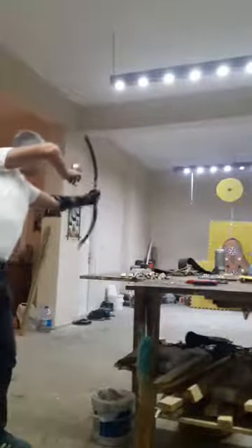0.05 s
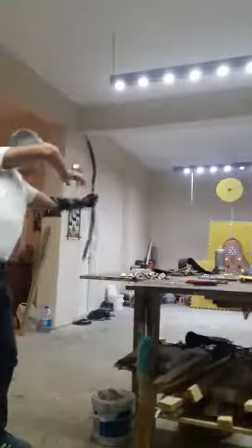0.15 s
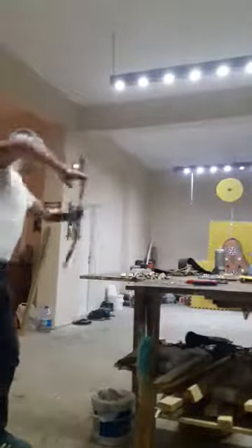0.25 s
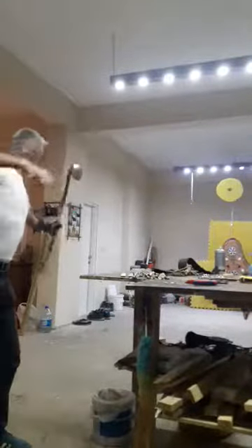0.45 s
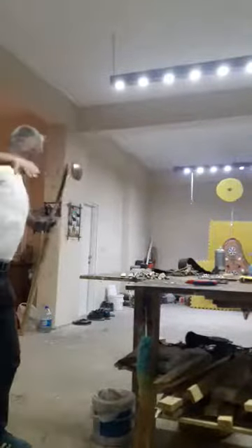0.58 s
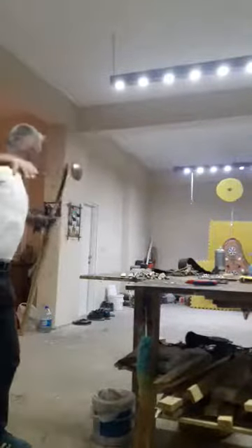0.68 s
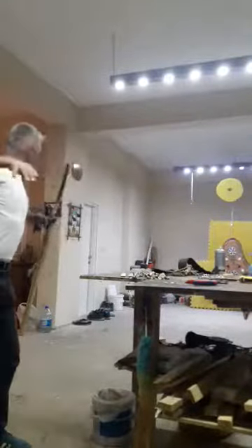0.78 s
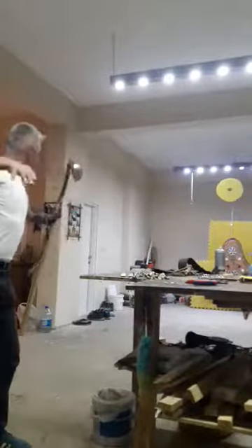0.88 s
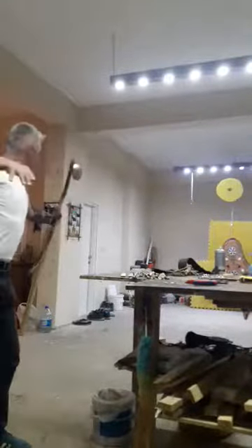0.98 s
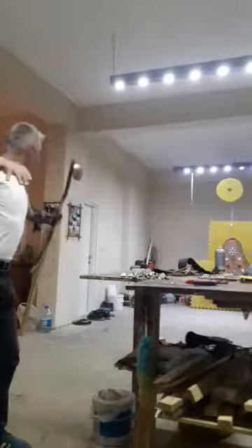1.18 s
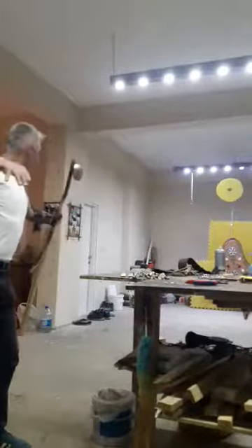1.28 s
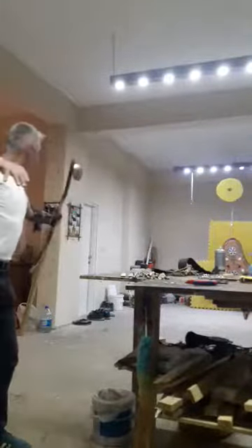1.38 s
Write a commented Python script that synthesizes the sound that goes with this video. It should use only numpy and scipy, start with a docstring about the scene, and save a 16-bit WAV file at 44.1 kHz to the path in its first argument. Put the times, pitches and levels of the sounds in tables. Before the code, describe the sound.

A single bow shot in a reverberant concrete workshop: the nearby string cracks, then the arrow hits its target with a woody knock. As the room rings out, small metallic clinks and a light cloth rustle follow.

```python
"""Archery in a concrete workshop

A bowstring creaks, slips off the fingers and slaps home; the arrow thuds into a target across the
room, exciting the modes of its board. The bare hall reverberates for over a second, and small metal
clinks and a rustle follow. A phone with two ports hears it, its gain control holding the loud part down."""
import sys
import numpy as np
from scipy import signal
from scipy.fft import rfft, irfft
from scipy.io import wavfile
from scipy.ndimage import uniform_filter1d

SR = 44100
rng = np.random.default_rng(int(sys.argv[2]) if len(sys.argv) > 2 else 0)


def unload_audio(sound):
    """Save the sound as a 16-bit wav file, at the path given as the first command line argument."""
    columns = np.transpose(np.atleast_2d(sound))
    # keep every value between -1 and 1, then stretch to whole-number steps
    steps = np.round(np.clip(columns, -1, 1) * 32767)
    wavfile.write(sys.argv[1], SR, steps.astype(np.int16))


N = 63945

# Likeness of diffuse sound at the two ports: frequency_hz, correlation
PORT_COHERENCE = [(60, 0.99), (110, 1), (200, 0.96), (370, 0.98), (670, 0.77), (1220, -0.3), (2240, -0.14),
                  (4090, -0.11), (7480, 0.092), (13700, 0.58)]
# Difference in port response: frequency_hz, left_minus_right_db
PORT_TILT = [(60, -6), (91, 0), (140, -5), (210, -2.5), (320, -4), (480, -3.5), (740, -7), (1120, -7),
             (1700, -7), (2570, -6), (3910, -7), (5930, -11.5), (9010, 9), (13700, -2.5)]
# Room noise spectrum: frequency_hz, relative_db
AIR_SPECTRUM = [(12, -24), (20, -3), (33, -20), (242, -19), (1040, -27), (1360, -25), (2930, -28),
                (3370, -29), (8090, -42.5), (12500, -41.5), (14000, -32)]
# Reverberation time: frequency_hz, t60_s
HALL_DECAY = [(25, 4.7), (50, 3.1), (90, 1.56), (160, 1.29), (420, 1.16), (750, 1.24), (1100, 1.26),
              (1900, 1.21), (2910, 1.062), (5500, 0.91), (7680, .8), (12000, 0.67)]
# Rustles: start_s, rise_s, level_db, slope_db_per_s
RUSTLE_EVENTS = [(.07, 0.043, -70, -6), (1.342, .01, -53, -14)]
# Rustle spectrum: frequency_hz, relative_db
RUSTLE_SPECTRUM = [(290, -8), (500, -7), (1250, -5), (1520, -11), (2130, -0.5), (4200, -20.5), (5420, -23),
                   (9000, -53), (11700, -75), (19800, -120)]
# Metal contacts: start_s, level_db, treble_boost_db, rattle_t60_s
CLINK_EVENTS = [(1.005, -55, 8.5, 0.4), (1.178, -45.5, 3, 0.48)]
# Modes of the metal pieces: pitch_hz, level_db, t60_s
METAL_MODES = [(4070, -7, .015), (4590, -1.5, .03), (5080, 0, 0.016), (5530, -0.5, 0.049),
               (5900, -8, 0.018), (7600, -8, 0.0046), (10760, -6.5, 0.014), (11600, -10, 0.0089),
               (12400, -15, .015)]
# Modes of the target board: pitch_hz, level_db, t60_s
BOARD_MODES = [(158, -25, .15), (201, -12.5, 0.043), (328, -18.5, 0.073), (428.6, -15.5, 0.099),
               (1846, -21.5, 0.084), (2022, -19.5, 0.063), (2680, -21, 0.065)]
# Reflections off the walls behind the target: delay_s, gain_db
BOARD_ECHOES = [(.0085, -3), (.018, -3), (0.0226, -3.5), (.046, -8)]
# Spectrum of the arrow's blow: frequency_hz, relative_db
HIT_SPECTRUM = [(24, -46), (40, -20.5), (87, -11.5), (125, -13), (159, -3.5), (258, -8), (336, -2),
                (450, -1.5), (573, -16), (766, -7.5), (844, -17.5), (976, -18), (1400, -10.5), (1620, -9),
                (1830, -5), (2570, -10.5), (3270, -15.5), (5990, -27), (6760, -35), (9260, -54),
                (13000, -52.5)]
# The string's creak, slip and slap: start_s, level_db, rise_s, t60_s, lowpass_hz
STRING_EVENTS = [(0.2324, -40, 0.00025, 0.0079, 2520), (0.2378, -24, 0.0019, 0.13, 4000),
                 (0.2486, -4, 0.00045, 0.015, 15000)]
# String spectrum: frequency_hz, relative_db
STRING_SPECTRUM = [(35, -46), (60, -19), (114, -20), (146, -12), (183, -21.5), (241, -4.5), (264, -9.5),
                   (317, -2.5), (447, -13.5), (512, -8), (827, -14), (993, -8.5), (1680, -8), (1840, 0),
                   (2010, -7.5), (2590, -3.5), (2900, -7.5), (5880, -9), (9080, -29.5), (12200, -30.5),
                   (14000, -56)]
# Reflections of the slap off nearby walls: delay_s, left_db, right_db
SLAP_ECHOES = [(.0035, -4, -7.5), (0.011, -13, -6), (0.0183, 0, -13), (0.0285, -29, -15), (0.031, -15, -19),
               (.037, -11, -11)]


def amp(db):
    return 10 ** (np.asarray(db) / 20)


def unit_rms(x):
    return x / np.sqrt(np.mean(x ** 2) + 1e-20)


def curve_at(points, hz):
    knots_hz, values = np.transpose(points)
    return np.interp(np.log(hz + 1), np.log(knots_hz + 1), values)


def add(mix, start_s, sound):
    part = mix[..., round(start_s * SR):][..., :sound.shape[-1]]
    part += sound[..., :part.shape[-1]]


def colour(x, spectrum):
    """A minimum-phase filter of unit energy imposes the spectrum causally."""
    log_gain = np.log(amp(curve_at(spectrum, abs(np.fft.fftfreq(8192, 1 / SR)))))
    response = np.exp(np.conj(signal.hilbert(log_gain)))
    taps = np.fft.ifft(response).real[:4096]
    return signal.fftconvolve(np.atleast_2d(x), taps[None] / np.linalg.norm(taps), axes=1)[:, :N]


def diffuse(size, level_db):
    """A diffuse field, shaped by level_db(hz, s), is partly coherent between two ports."""
    hop = size // 4
    frames = N // hop + 5
    hz = np.fft.rfftfreq(size, 1 / SR)[:, None]
    a, b, c, d = rng.standard_normal((frames, len(hz), 4)).T
    coherence = np.clip(curve_at(PORT_COHERENCE, hz), -1, 1)
    left = a + 1j * b
    right = coherence * left + np.sqrt(1 - coherence ** 2) * (c + 1j * d)
    spectra = np.array([left, right]) * amp(level_db(hz, np.arange(frames) * hop / SR))
    return signal.istft(spectra, nperseg=size, noverlap=size - hop)[1][:, :N]


def burst(t60, rise_s):
    """A brief contact radiates broadband noise that decays exponentially."""
    t = np.arange(16000) / SR
    noise = unit_rms(diffuse(256, lambda hz, s: 0)[:, :len(t)])
    return noise * amp(-60 * t / t60) * np.minimum(t / rise_s, 1)


def ring(modes):
    """Free vibration is a sum of damped sinusoids."""
    t = np.arange(12000) / SR
    return sum(amp(db - 60 * t / t60) * np.sin(2 * np.pi * hz * t) for hz, db, t60 in modes)


def air(level_db=-66.5):
    """Stationary diffuse noise forms the hush of the room."""
    return amp(level_db) * unit_rms(diffuse(1024, lambda hz, s: curve_at(AIR_SPECTRUM, hz)))


def hall(source, wet_db, gap_s=.001, build_s=0.0062, build_cycles=2.7):
    """Reverberation builds soonest in the treble, and each band decays at its own rate."""
    def tail_db(hz, s):
        built = 1 - np.exp(-(s + gap_s) * (hz + 1) / build_cycles)
        return 20 * np.log10(built) - 60 * s / curve_at(HALL_DECAY, hz)
    t = np.arange(N) / SR
    onset = 1 - np.exp(-np.maximum(t - gap_s, 0) / build_s)
    tail = diffuse(512, tail_db) * onset
    return amp(wet_db) * signal.fftconvolve(source, tail / np.linalg.norm(tail[0]), axes=1)[:, :N]


def rustle():
    """Amplitude-modulated noise rises quickly and fades slowly, like moving cloth."""
    hiss = unit_rms(diffuse(256, lambda hz, s: curve_at(RUSTLE_SPECTRUM, hz)))
    t = np.arange(N) / SR
    envelope = sum(np.clip((t - start_s) / rise_s, 0, 1) * amp(db + slope * np.maximum(t - start_s, 0))
                   for start_s, rise_s, db, slope in RUSTLE_EVENTS)
    return hiss * envelope


def clinks(treble_hz=8000, hall_lowpass_hz=6500):
    """Forced vibration: rattling contacts drive the modes of small metal pieces."""
    direct = np.zeros((2, N))
    for start_s, db, boost_db, rattle_t60 in CLINK_EVENTS:
        rattle = burst(rattle_t60, rise_s=0.0025)
        tone = ring([(hz, db + mode_db + boost_db * (hz > treble_hz), t60)
                     for hz, mode_db, t60 in METAL_MODES])
        add(direct, start_s, signal.fftconvolve(tone[None], rattle / np.linalg.norm(rattle[0]), axes=1))
    dulled = signal.lfilter(*signal.butter(2, hall_lowpass_hz, fs=SR), direct[:1])
    return direct + hall(dulled, wet_db=-0.5)


def arrow(hit_s=.385, blow_db=-6, highpass_hz=141):
    """Impact excites the hall and the board's modes; the walls return the knock as early reflections."""
    blow, impulse, board = np.zeros((2, N)), np.zeros(N), np.zeros(N)
    add(blow, hit_s, amp(blow_db) * burst(t60=0.086, rise_s=0.0053))
    add(impulse, hit_s, np.ones(1))
    knock = ring(BOARD_MODES)
    add(board, hit_s, knock)
    for delay_s, db in BOARD_ECHOES:
        add(board, hit_s + delay_s, amp(db) * knock)
    highpass = signal.butter(2, highpass_hz, "high", fs=SR)
    thud = signal.lfilter(*highpass, blow) + hall(impulse[None], wet_db=22.5)
    return colour(thud, HIT_SPECTRUM) + signal.lfilter(*highpass, board)


def bow(highpass_hz=1260):
    """Impulsive excitation: the string creaks, slips and slaps the limbs, each time driving the hall."""
    near, impulses = np.zeros((2, N)), np.zeros(N)
    for start_s, db, rise_s, t60, lowpass_hz in STRING_EVENTS:
        lowpass = signal.butter(2, lowpass_hz, fs=SR)
        crack = amp(db) * signal.lfilter(*lowpass, burst(t60, rise_s))
        add(near, start_s, crack)
        add(impulses, start_s, amp(db) * signal.lfilter(*lowpass, signal.unit_impulse(200)))
    slap = crack  # the last string event
    for delay_s, left_db, right_db in SLAP_ECHOES:
        add(near, start_s + delay_s, slap * amp([[left_db], [right_db]]))
    near = signal.lfilter(*signal.butter(1, highpass_hz, "high", fs=SR), near)
    return colour(near + hall(impulses[None], wet_db=23), STRING_SPECTRUM)


def scene():
    """Superposition: the pressures of the sources add."""
    return bow() + arrow() + clinks() + rustle() + air()


def record(dry, knee_db=-15.5, cut_db_per_db=0.41, release_db_per_s=55, cutoff_hz=13300):
    """Each port colours the sound; compression, clipping and a band limit follow."""
    tilt_db = curve_at(PORT_TILT, np.fft.rfftfreq(N, 1 / SR)) / 2
    ports = irfft(rfft(dry) * amp([tilt_db, -tilt_db]), N)
    power = uniform_filter1d((ports ** 2).mean(0), 300)
    power_db = 10 * np.log10(abs(power) + 1e-12)
    release_db = np.arange(N) * release_db_per_s / SR
    held_db = np.maximum.accumulate(power_db + release_db) - release_db  # rises at once, falls slowly
    excess_db = np.maximum(held_db - knee_db, 0)
    compressed = ports / amp(cut_db_per_db * uniform_filter1d(excess_db, 100))
    lowpass = signal.firwin(255, cutoff_hz, window=("kaiser", 9), fs=SR)
    return signal.oaconvolve(np.clip(compressed, -.95, .95), lowpass[None], "same")


dry = scene()
out = record(dry)
unload_audio(out)
```